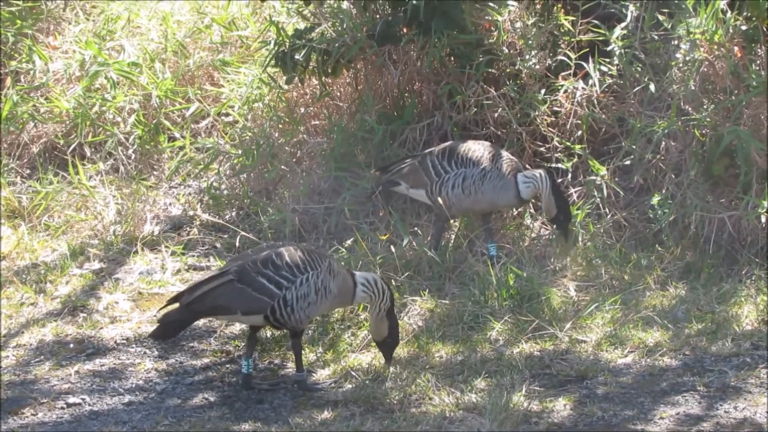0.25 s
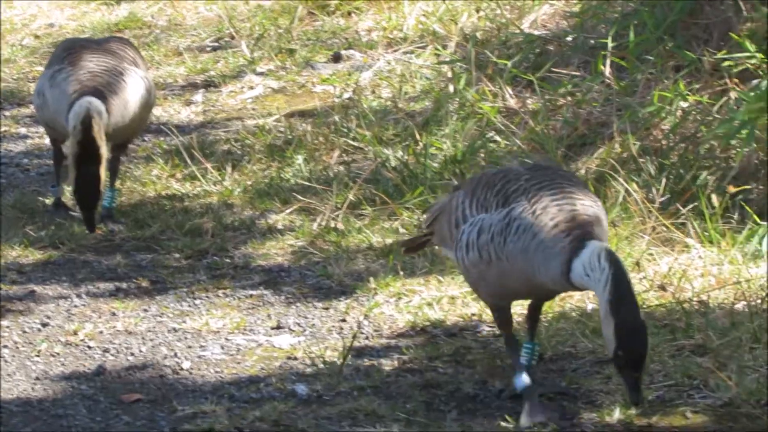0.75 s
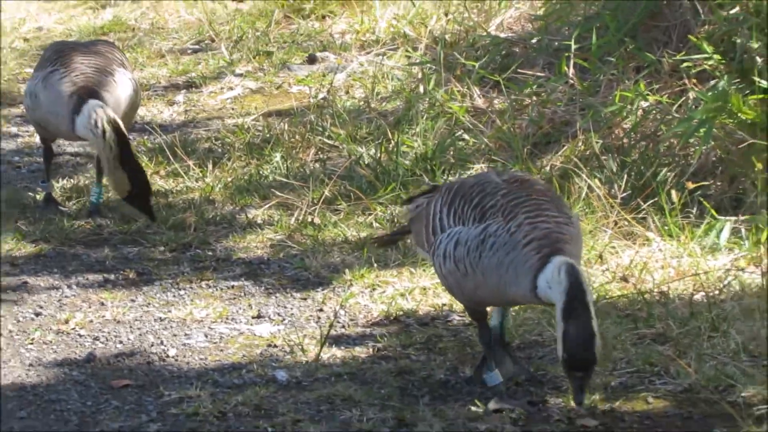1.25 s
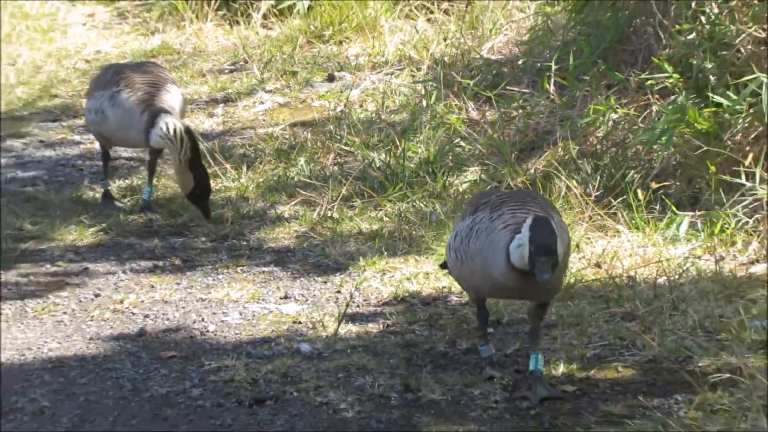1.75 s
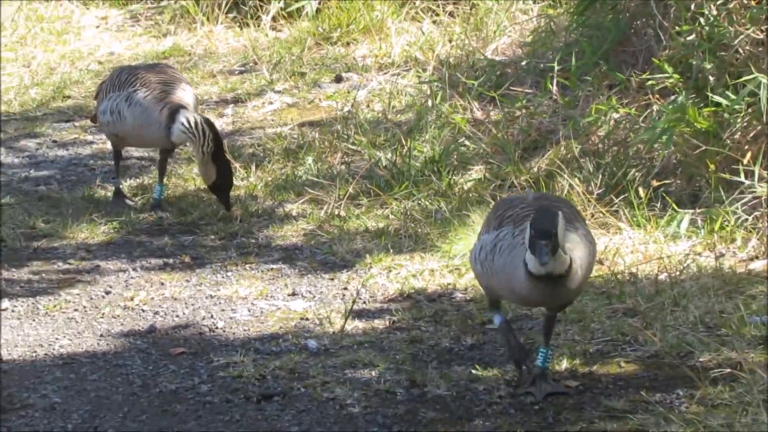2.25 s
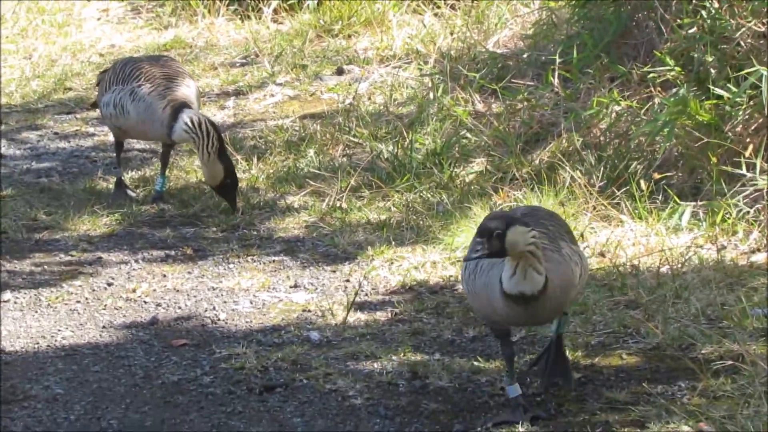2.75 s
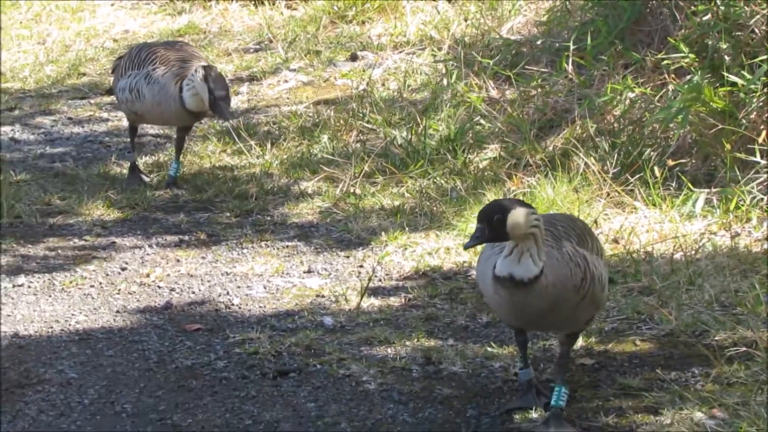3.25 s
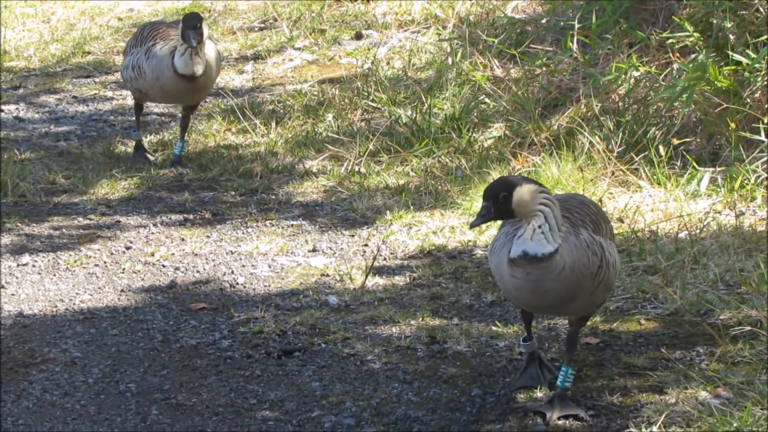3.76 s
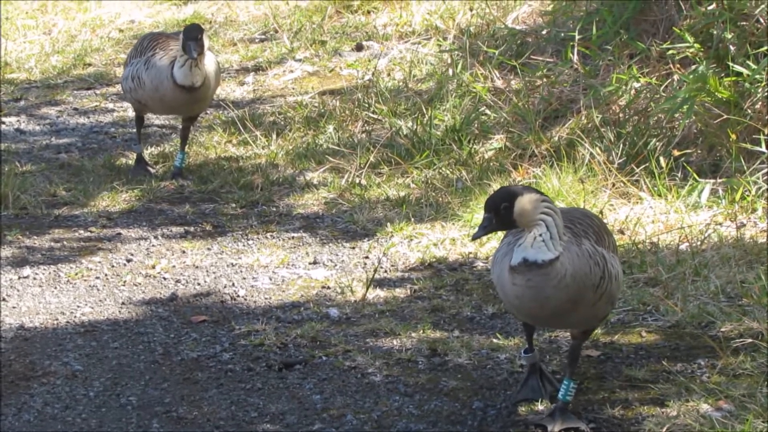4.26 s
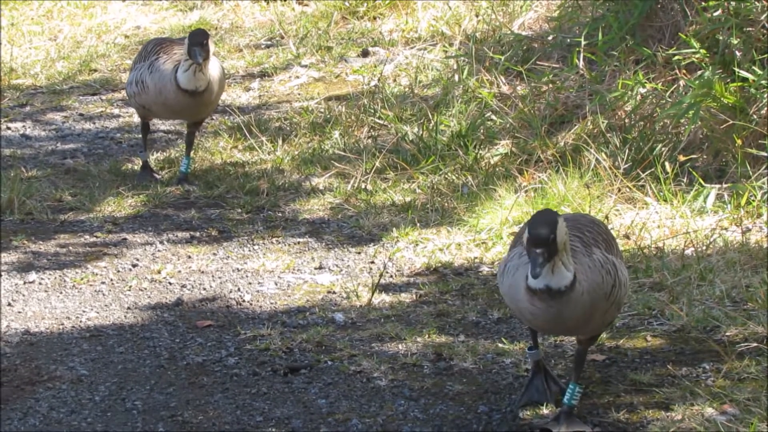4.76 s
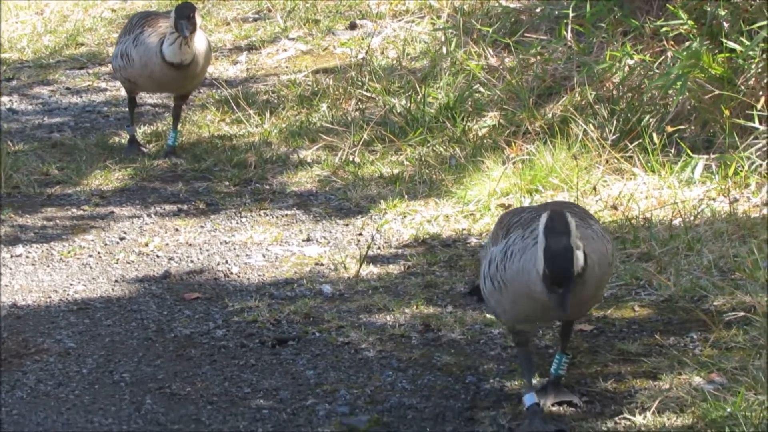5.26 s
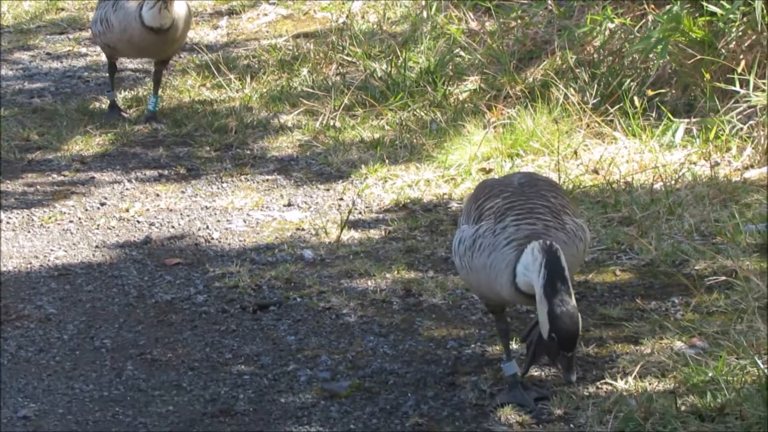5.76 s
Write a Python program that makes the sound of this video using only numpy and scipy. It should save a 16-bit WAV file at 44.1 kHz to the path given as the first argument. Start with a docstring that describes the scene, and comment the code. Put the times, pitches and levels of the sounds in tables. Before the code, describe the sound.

Close plastic clicks and a short zoom whir ending in a sharp knock, followed by faint grass tearing, goose grunts and bird peeps.

```python
"""Beside a gravel track in still open air, geese graze near a hand-held camera.
The camera is closest and loudest: its zoom clicks, its gears whir, and the lens knocks to a stop.
A goose mutters through its closed bill, grass tears and ticks, and a small bird whistles thin peeps.
Puffs of wind push on the microphones, over a distant low rush and a faint hiss of leaves."""
import sys
import numpy as np
from scipy import signal
from scipy.fft import rfft, irfft, next_fast_len
from scipy.io import wavfile
from scipy.ndimage import uniform_filter1d

SR = 44100
rng = np.random.default_rng(int(sys.argv[2]) if len(sys.argv) > 2 else 0)


def dump_mix(stems):
    """Bounce the given channels to the path in sys.argv[1] as a 16-bit WAV at rate SR."""
    frames = np.atleast_2d(stems).T  # one column per channel
    limited = np.clip(frames, -1, 1)  # hard clip at full scale
    pcm = np.round(limited * 32767).astype(np.int16)
    wavfile.write(sys.argv[1], SR, pcm)


N = 265658
T = np.arange(N) / SR
TOP_HZ = 15800  # upper edge of the sound
OPPOSITE = np.array([[1], [-1]])  # plus on the left, minus on the right


def camera_knocks(rise_s=0.00041, body_low_hz=200, finger_damping=0.79):
    """Each blow makes the camera body ring; a finger on the zoom lever shortens the ring."""
    # blows on the camera: (time [s], level [dB], place [0 zoom lever..1 lens stop], hardness [Hz],
    # crack level [dB])
    blows = [(0.1995, -33, 0.84, 2980, -26), (1.1705, -17, 0, 6000, -41), (1.1718, -14.5, 0.02, 9000, -38),
             (1.1733, -13.5, 0.14, 5000, -42), (1.7646, -19, 0.7, 2500, -37),
             (1.7711, 1, 0.94, 12000, -28.5), (1.8843, -37, 0, 700, -22), (1.8858, -26.5, 0, 200, -38),
             (1.9023, -37.5, 0.12, 9000, -30)]
    # tones the body rings at: (pitch [Hz], ring time [s], level struck at the lever [dB],
    # level struck at the stop [dB], left ahead of right [rad], left minus right [dB])
    body_tones = [(312, 0.048, -18.5, -31, 2.5, 2.5), (410, 0.046, -17, -36, 3.5, 4),
                  (550, .045, -5.5, -30, 1.5, 3), (640, 0.045, -6, -15, 2.65, -2.5),
                  (793, 0.021, -10.5, -6, -1, -12), (890, 0.036, -5.5, -8, 2.5, 5.5),
                  (990, 0.019, -24.5, 8.5, 3.5, 0), (1262, 0.025, -1.5, 0, -2, 6),
                  (1387, 0.045, -13.5, -3, 3.5, -2), (1700, 0.03, -6, -10.5, 0, -1),
                  (1830, 0.021, 1.5, 0.5, 3, -1.5), (2260, 0.046, -8.5, -20.5, 3.5, 9.5),
                  (2480, 0.0072, 8.5, -6, -1.17, -2), (3000, 0.02, -3, -6.5, 2.3, -6),
                  (3780, 0.016, -20.5, -19.5, 0, -19.5), (4210, 0.015, -10.5, -12.5, -1, -5),
                  (5030, 0.021, -3.5, -26.5, -2, -3.5), (7060, 0.013, -30, -17, -7.5, -5),
                  (7760, 0.0067, -21.5, -15, -3.5, -4), (12770, .012, -26, -16.5, -1.5, -9)]
    out, t = np.zeros((2, N)), T[:SR // 5]
    crack_shape = 3.5 * fade(t, .004) + fade(t, .016)  # hard plastic: a spike, then a short rattle
    for start, db, place, hard_hz, crack_db in blows:
        ring, ring_share = 0, np.interp(place, [0, 1], [finger_damping, 1])
        for hz, t60, lever_db, stop_db, lead, side_db in body_tones:
            strength = gain(np.interp(place, [0, 1], [lever_db, stop_db]))
            tone = np.sin(2 * np.pi * hz * t + OPPOSITE * lead / 2)
            ring = ring + strength * pan(side_db) * fade(t, t60 * ring_share) * tone
        body = soften(ring * (1 - np.exp(-t / rise_s)), hard_hz)  # a softer blow sounds duller
        body = body - soften(body, body_low_hz)  # a small body gives off little bass
        body = body / np.abs(body).max()
        crack_noise, buzz_noise = rng.standard_normal((2, 2, len(t)))
        crack = unit(band(crack_noise, hz=7200, width=3500)) * crack_shape
        buzz = unit(band_twice(buzz_noise, hz=1950, width=450)) * fade(t, t60=0.12)  # loose parts
        add(out, start, gain(db) * (body + gain(crack_db) * crack + gain(-32) * buzz))
    return out


def zoom_gears(turns_per_s=52.3, throb=0.17, grain_db=-0.5):
    """Tiny gear teeth rub and tick into the lens barrel, pulsing slightly with each turn."""
    # where the gears make the barrel ring: (pitch [Hz], half the filter width [Hz], level [dB],
    # likeness of left and right [-1..1])
    resonances = [(503, 360, -2.5, 0.033), (1350, 134, 3.5, -0.55), (1760, 350, -2, -0.54),
                  (2460, 520, -12.5, -0.15), (3300, 480, -8.5, -0.22), (5100, 340, -8.5, -0.95),
                  (7470, 1500, -13, 0.25), (8720, 1540, -7.5, -0.15), (10700, 1600, -11.5, -0.37),
                  (12900, 620, -12, .2)]
    turns = np.cumsum(turns_per_s * (1 + 0.0087 * wander(6.8))) / SR
    friction = (1 + throb * np.sin(2 * np.pi * turns)) * gain(grain_db * wander(1500))
    whir = 0
    for hz, half_width, db, alike in resonances:
        shared, side = band_twice(friction * rng.standard_normal((2, N)), hz, 2 * half_width)
        whir = whir + gain(db) * (np.sqrt(1 + alike) * shared + np.sqrt(1 - alike) * side * OPPOSITE)
    rub = band(friction * rng.standard_normal((2, N)), hz=3300, width=12000)
    return (unit(whir) + gain(-6.5) * unit(rub)) * motor_loudness()


def motor_loudness(start_s=1.171, creep_s=1.785, end_s=1.899, spin_up_s=0.0063, brake_s=0.0051):
    """The zoom motor spins up, grows louder as the lens travels, creeps on more quietly, and brakes."""
    start_db, rise_db_per_s, creep_db = -49, 7.5, -5
    running = ramp(start_s, spin_up_s) * (1 - ramp(end_s - brake_s, brake_s))
    travel_s = np.clip(T, start_s, creep_s) - start_s
    return running * gain(start_db + rise_db_per_s * travel_s + creep_db * ramp(creep_s, brake_s))


def goose_grunts(crest=.42):
    """A goose mutters through its closed bill: the pitch rises to a crest, then drops."""
    # soft grunts: (time [s], length [s], highest pitch [Hz], final pitch [Hz], level [dB])
    grunts = [(2.023, 0.036, 714, 480, -59.5), (2.261, 0.046, 448, 400, -50),
              (2.651, .066, 802, 335, -54.5)]
    # where the throat rings: (pitch [Hz], width [Hz], level [dB])
    throat = [(470, 160, 1.5), (1760, 570, -13), (3500, 1100, -15)]
    out, jitter = np.zeros((1, N)), 1 + .035 * wander(500)
    for start, length, top_hz, end_hz, db in grunts:
        progress = np.linspace(0, 1, int(length * SR))
        from_crest = np.where(progress > crest, (progress - crest) / (1 - crest), crest - progress)
        hz = top_hz - (top_hz - end_hz) * from_crest ** 2
        phase = 2 * np.pi * np.cumsum(hz * jitter[int(start * SR):][:len(progress)]) / SR
        swell = progress * np.sqrt(1 - progress)  # grows, then stops short
        buzz = sum(np.sin(k * phase) for k in range(1, 11)) * swell
        voice = sum(gain(ring_db) * band(buzz, ring_hz, width) for ring_hz, width, ring_db in throat)
        add(out, start, gain(db) * unit(voice))
    return out * pan(db=1)


def grass_rustles(fibres_per_s=5000, spread_db=4.0):
    """Many grass fibres break one after another: a fine crackle over the duller scuff of the turf."""
    # grass tearing and feet scuffing: (loudest time [s], rise [s], fall [s], level [dB],
    # turf compared with crackle [dB], brightness [Hz])
    rustles = [(0.178, 0.021, 0.034, -57.5, 3.5, 12000), (0.735, 0.013, 0.028, -72, 17, 7000),
               (0.85, 0.011, 0.016, -67, 4, 10000), (0.965, 0.022, 0.023, -69, 11.5, 7000),
               (1.09, 0.017, 0.12, -69.5, 12.5, 7000), (2.036, 0.012, 0.013, -67, 19.5, 6000),
               (2.128, 0.007, 0.0085, -51, -14, 9000), (2.293, 0.029, 0.042, -51, 5.5, 7600),
               (2.67, 0.077, 0.047, -62, 6.5, 7000), (2.80, 0.036, .06, -60.5, -18, 8000)]
    breaks = (rng.random((2, N)) < fibres_per_s / SR) * rng.choice([-1, 1], (2, N))
    fibres = breaks * gain(spread_db * np.minimum(rng.exponential(size=(2, N)), 5))
    crackle = unit(band(fibres, hz=3900, width=5500))
    turf = unit(band(fibres, 400, 400) + gain(-6) * band(fibres, 830, 500)
                + gain(-14) * band(fibres, 1820, 360))
    out = 0
    for peak_s, rise, fall, db, turf_db, bright_hz in rustles:
        pull = gain(db) * np.exp(-((T - peak_s) / np.where(T < peak_s, rise, fall)) ** 2 / 2)
        out = out + pull * soften(crackle + gain(turf_db) * turf, bright_hz, order=2)
    return out * pan(db=3)


def stem_snaps():
    """A single snapping stem or bit of grit gives one short, bright tick."""
    # ticks: (time [s], peak level [dB], pitch [Hz], ring time [s], left minus right [dB])
    snaps = [(0.058, -39, 3130, 0.0087, 8), (0.058, -41.5, 8260, 0.01, 6), (0.609, -44, 6000, .008, 0),
             (0.6156, -37.5, 6300, 0.0052, 5), (0.621, -44, 6000, 0.0092, -2), (2.104, -46, 8200, .012, 4),
             (2.125, -42, 5070, .012, 0), (2.2815, -29, 1320, 0.014, 7), (2.283, -41, 5500, .008, -3),
             (2.299, -40, 1970, 0.016, 7), (2.317, -37, 4200, 0.008, 8), (2.485, -49, 7150, 0.018, -8),
             (2.956, -46, 7500, 0.013, 4), (3.185, -45.5, 8300, 0.058, 0), (4.6272, -44.5, 3270, 0.019, 13),
             (4.666, -45, 4000, 0.019, 6), (5.151, -44, 6000, .025, 3), (5.642, -44.5, 5000, .02, 4)]
    out, t = np.zeros((2, N)), T[:SR // 12]
    for start, db, hz, t60, side_db in snaps:
        burst = rng.standard_normal((2, len(t))) * fade(t, t60)
        tick = band_twice(burst, hz, width=0.87 * hz)
        add(out, start, gain(db) * pan(side_db) * tick / np.abs(tick).max())
    return out


def bird_peeps(bend=1.2, hiss_db=-6, echo_db=-4):
    """A small bird whistles thin, raspy, mostly falling notes, and the shrubs scatter them."""
    # peeps: (time [s], length [s], start pitch [Hz], end pitch [Hz], level [dB], octave above [dB])
    peeps = [(0.454, .07, 3140, 2430, -68.5, 1.5), (1.724, 0.029, 3600, 2900, -68, 7),
             (2.008, 0.095, 3470, 2770, -66, 8.5), (2.102, 0.053, 2620, 2550, -62, 2),
             (2.232, .05, 3250, 2550, -59, 4.5), (2.485, 0.08, 3050, 2660, -60, -2),
             (2.555, 0.1, 2705, 2850, -60, -0.5), (2.715, 0.063, 3540, 2530, -56.5, 0.5),
             (2.845, .038, 3550, 2750, -60, -2), (3.369, 0.047, 2900, 2670, -66, -3),
             (3.407, .06, 2660, 2500, -67, 1), (4.874, 0.062, 3130, 2450, -56.5, -8)]
    wobble = (1 + .018 * wander(700)) * (1 + 0.0154 * wander(90))  # the pitch wavers
    rasp = unit(gain(3.5 * wander(400))) * unit(gain(wander(80)))  # the note breaks up
    hiss = unit(band_twice(rng.standard_normal(N), hz=6600, width=2000))
    out, t = np.zeros((1, N)), T[:SR // 3]
    for start, length, start_hz, end_hz, db, octave_db in peeps:
        progress = np.linspace(0, 1, int(length * SR))
        now = int(start * SR) + np.arange(len(progress))
        hz = start_hz + (end_hz - start_hz) * progress ** bend  # slides slowly first, then faster
        phase = 2 * np.pi * np.cumsum(hz * wobble[now]) / SR
        voice = np.sin(phase) + gain(octave_db) * (np.sin(2 * phase) + gain(hiss_db) * hiss[now])
        swell = 2 * np.sqrt(progress * (1 - progress))
        add(out, start, gain(db) * swell * voice)
    out *= rasp
    shrubs = rng.standard_normal((2, len(t))) * fade(t, t60=0.25)
    shrubs /= np.sqrt(np.sum(shrubs ** 2) / 2)
    return out + gain(echo_db) * signal.fftconvolve(out, shrubs, axes=1)[:, :N]


def wind_puffs(left_share=-0.52):
    """A swirl of air pushes, then pulls at the right microphone; the left gets a weaker mirror image."""
    # puffs: (time [s], pitch [Hz], peak level on the right [dB])
    puffs = [(0.521, 62, -45), (4.509, 75, -36.5), (4.5168, 110, -56), (4.542, 90, -43),
             (4.5686, 80, -31.5)]
    pressure = np.zeros(N)
    for middle_s, hz, db in puffs:
        phase = 2 * np.pi * hz * (T - middle_s)
        pressure -= gain(db) * phase * np.exp((1 - phase ** 2) / 2)
    return pressure * np.array([[left_share], [1]])


def open_air(shared_db=-55.5, side_db=-52, freshen_s=2.6):
    """A breeze picks up from a lull and settles: a distant low rush and a faint hiss of leaves."""
    # air noise that both sides share: (frequency [Hz], relative level [dB])
    shared_spectrum = [(15, -41), (25, -4.5), (157, -1), (194, -0.5), (414, -1), (729, -4.5), (791, -1.5),
                       (905, -4), (1150, -6), (1280, -8.5), (1550, -9.5), (4330, -17), (5230, -17),
                       (12400, -26.5), (15800, -31)]
    # air noise that is opposite on the two sides: (frequency [Hz], relative level [dB])
    side_spectrum = [(15, -48), (25, -8.5), (130, 0), (179, -5), (216, 0.5), (276, -2.5), (449, -3.5),
                     (513, -4), (604, -5.5), (929, -8), (1010, -8.5), (1730, -15.5), (8050, -28),
                     (14200, -34), (15800, -44)]
    air = gain(shared_db) * shaped_noise(shared_spectrum)
    air = air + gain(side_db) * shaped_noise(side_spectrum) * OPPOSITE
    rush = soften(air, hz=2500)
    hiss = air - rush
    lull = np.exp(-T / freshen_s)
    rush_db = -5.5 * lull + .45 * wander(18)
    hiss_db = 0.5 - 2 * lull + .3 * wander(14)
    return rush * pan(db=-1.5) * gain(rush_db) + hiss * gain(hiss_db)


def gain(db):
    """Turn decibels into a number to multiply by."""
    return 10 ** (np.asarray(db) / 20)


def unit(x):
    """Scale to an average (rms) level of 1."""
    return x / np.sqrt(np.mean(x ** 2))


def pan(db):
    """Left and right gains that make the left louder by db."""
    return gain(OPPOSITE * db / 2)


def band(x, hz, width):
    """Keep the sound near one pitch; width is in Hz."""
    g, k = np.tan(np.pi * min(hz, TOP_HZ) / SR), width / hz
    return signal.lfilter([g * k, 0, -g * k], [1 + g * k + g * g, 2 * g * g - 2, 1 - g * k + g * g], x)


def band_twice(x, hz, width):
    """A band with steeper edges."""
    return band(band(x, hz, width), hz, width)


def soften(x, hz, order=1):
    """Turn down the sound above hz."""
    return signal.sosfilt(signal.butter(order, min(hz, TOP_HZ), fs=SR, output="sos"), x)


def shaped_noise(spectrum):
    """Noise that follows (frequency [Hz], level [dB]) points."""
    hz, db = np.transpose(spectrum)
    size = next_fast_len(N)
    freqs = np.maximum(np.arange(size // 2 + 1) * SR / size, 1)
    shape = gain(np.interp(np.log(freqs), np.log(hz), db))
    return unit(irfft(rfft(rng.standard_normal(size)) * shape, size)[:N])


def wander(rate):
    """Glide to a new random value rate times a second."""
    step = int(SR / rate)
    held = np.repeat(rng.standard_normal(N // step + 1), step)
    return unit(uniform_filter1d(held, step)[:N])


def fade(t, t60):
    """Die away by 60 dB in t60 seconds, the ring time."""
    return np.exp(-np.log(1000) * t / t60)


def ramp(start_s, length_s):
    """Rise from 0 to 1 in a straight line."""
    return np.clip((T - start_s) / length_s, 0, 1)


def add(out, start_s, sound):
    """Mix a short sound in at start_s."""
    i = int(start_s * SR)
    out[:, i:i + sound.shape[-1]] += sound[..., :N - i]


def scene():
    """The camera's own noises in front of the grazing geese, the small bird and the open air."""
    return (camera_knocks() + zoom_gears() + goose_grunts() + grass_rustles() + stem_snaps()
            + bird_peeps() + wind_puffs() + open_air())


def record(dry, silence_s=0.214, return_s=.458, drop_db=-7):
    """The sound drops out briefly near the start; peaks stop at full scale and the top treble is cut."""
    dying = gain(drop_db) * fade(np.maximum(T - silence_s, 0), t60=0.035)
    level = np.where(T < silence_s, 1, np.maximum(dying, ramp(return_s, 0.0012)))
    treble_cut = signal.ellip(10, .2, 80, TOP_HZ, fs=SR, output="sos")
    return signal.sosfilt(treble_cut, np.clip(dry * level, -1, 1))


dry = scene()
out = record(dry)
dump_mix(out)
```